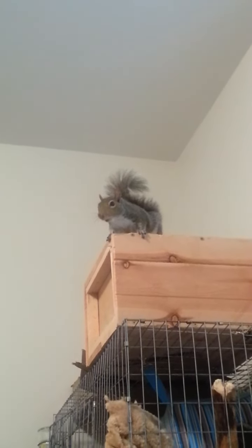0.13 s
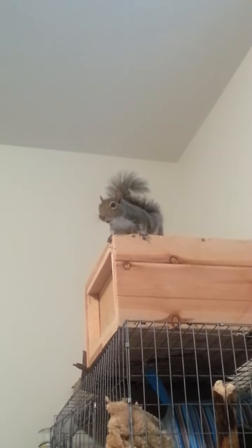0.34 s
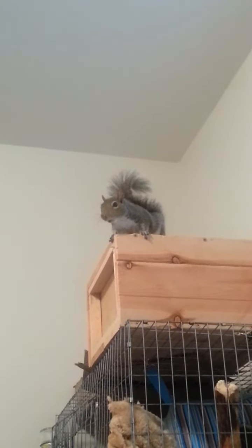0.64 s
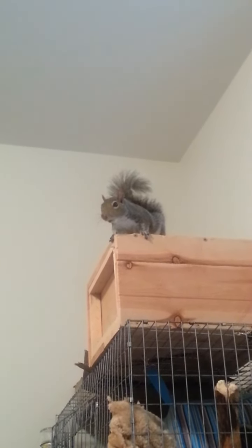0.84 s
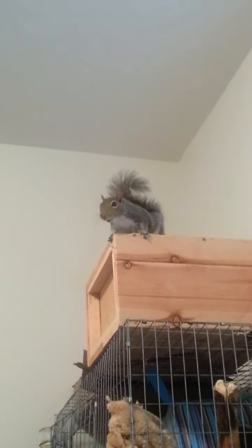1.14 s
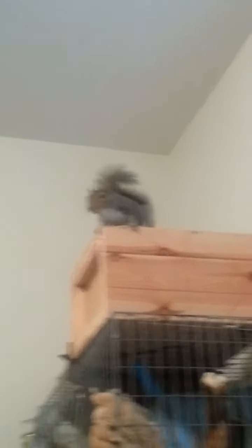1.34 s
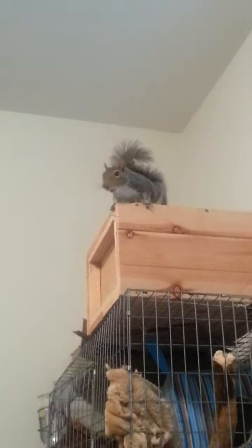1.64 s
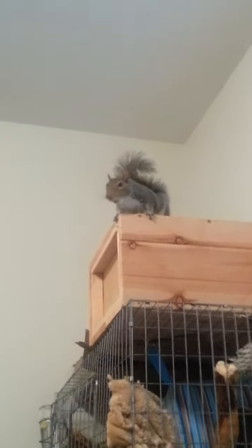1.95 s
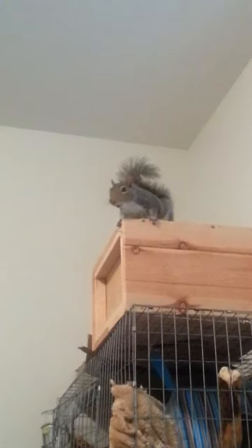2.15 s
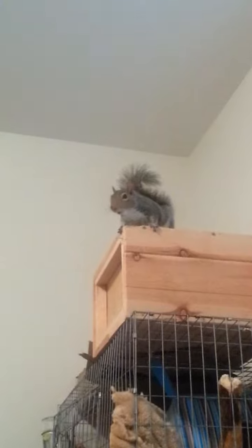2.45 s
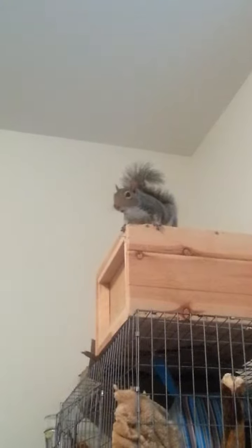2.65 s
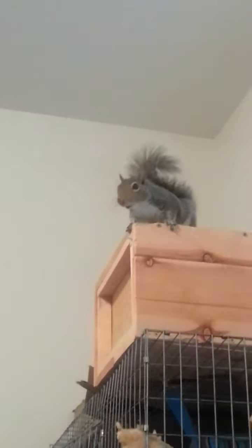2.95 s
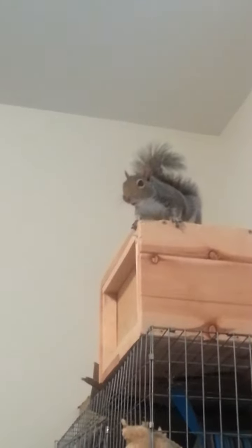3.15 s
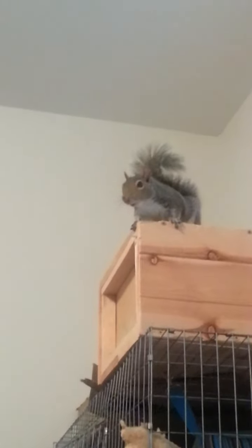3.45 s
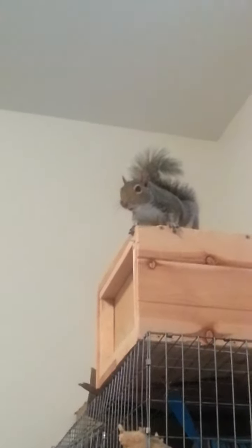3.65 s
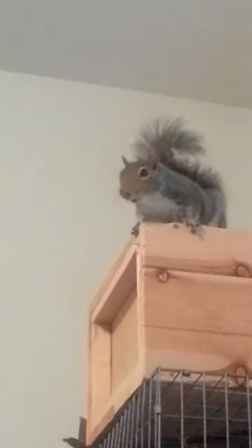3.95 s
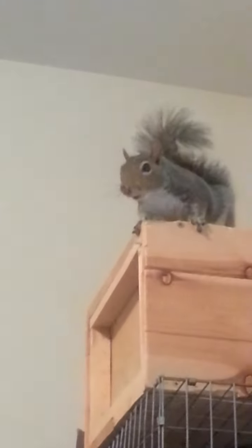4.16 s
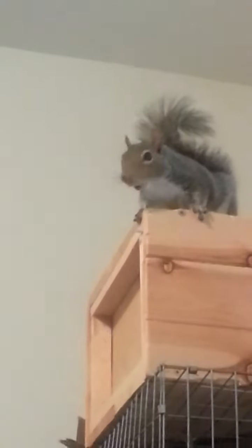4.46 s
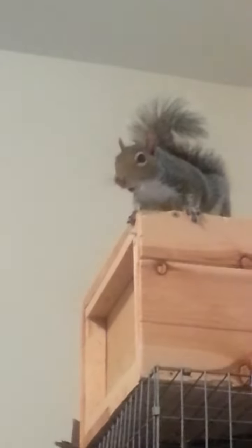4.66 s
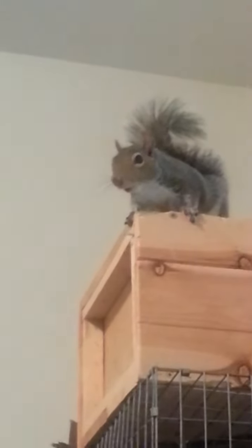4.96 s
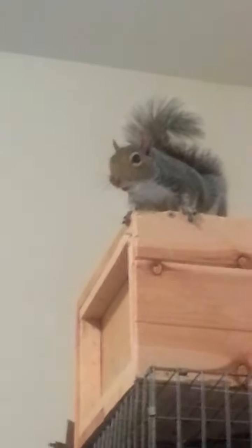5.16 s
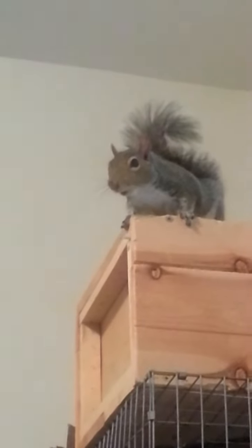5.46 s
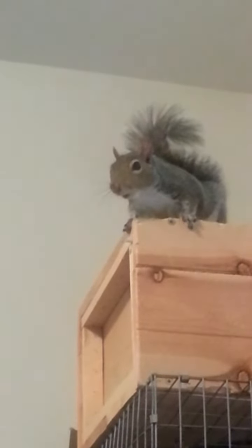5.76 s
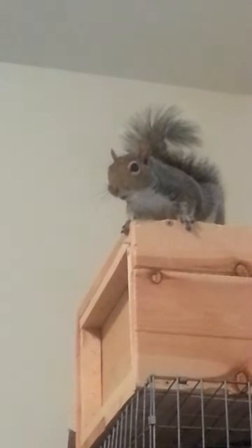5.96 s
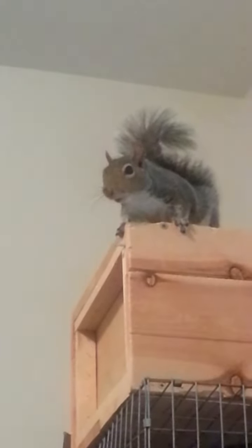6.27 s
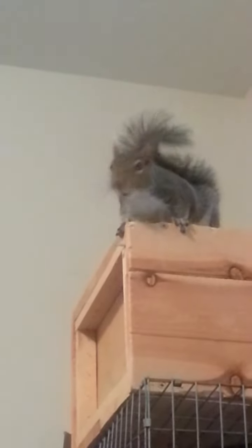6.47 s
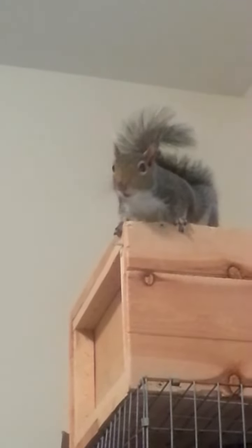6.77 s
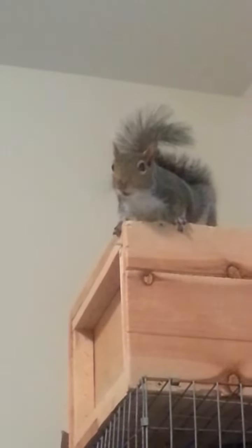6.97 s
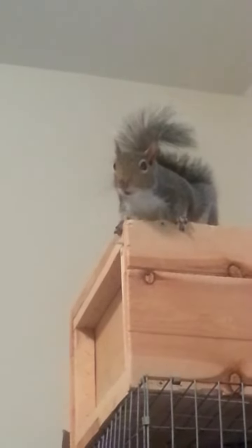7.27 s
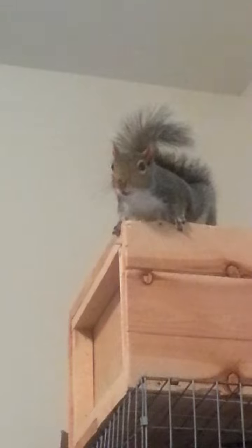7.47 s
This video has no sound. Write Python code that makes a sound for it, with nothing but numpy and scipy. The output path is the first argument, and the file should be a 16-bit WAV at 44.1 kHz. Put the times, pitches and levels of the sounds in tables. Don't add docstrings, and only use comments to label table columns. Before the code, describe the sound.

A young squirrel in a bare room gives two long, harsh rasping calls that sag in pitch, then three short sharp barks over faint house rumble.

```python
import sys
import numpy as np
from scipy import signal
from scipy.fft import rfft, irfft, next_fast_len
from scipy.io import wavfile
from scipy.ndimage import uniform_filter1d

SR = 44100
rng = np.random.default_rng(int(sys.argv[2]) if len(sys.argv) > 2 else 0)


def elevation(decibels):
    levels = np.asarray(decibels, float)
    return 10 ** (levels / 20)


def generate_wav(sig):
    pcm = np.round(np.clip(np.atleast_2d(sig).T, -1, 1) * 32767).astype(np.int16)
    wavfile.write(sys.argv[1], SR, pcm)


N = 335601

# frequency_hz, level_db (per Hz)
HOUSE_SPECTRUM = [(15, -71), (25, -26.5), (35, -20), (48, -6), (108, -3), (229, -12.5), (256, -14),
                  (545, -19.5), (840, -19.5), (1890, -27), (2550, -29), (5570, -29.5), (8360, -34),
                  (14800, -34.5), (16000, -34.5)]
HOUSE_DB = -49
# frequency_hz, likeness (-1 to 1)
LEFT_RIGHT_LIKENESS = [(60, 0.71), (180, 0.74), (550, 0.24), (1650, 0.13), (4970, -0.1), (15000, -0.69)]
# frequency_hz, level_db (per Hz)
TRAFFIC_SPECTRUM = [(53, -30), (90, -6.5), (146, -11.5), (230, -8.5), (287, -12), (374, -22.5),
                    (789, -12.5), (1990, -24), (3000, -27), (3900, -59), (6600, -120)]
# time_s, level_db
TRAFFIC_FADE = [(0, -50.5), (.6, -50.5), (1.2, -54), (1.6, -53), (2.3, -61), (3, -63.5), (7.61, -78)]
# pitch_hz, width_hz, level_db
ENGINE_TONES = [(142.6, 20, -1.5), (292.1, 6.5, -7.5)]
# time_s, peak_db, half_width_s
ENGINE_SWELLS = [(.23, -51, .05), (.78, -49, 0.39), (1.48, -47.5, 0.19), (2.05, -59, .07), (2.95, -52, 0.2),
                 (3.4, -53, .1), (3.92, -44.5, 0.28), (4.68, -43, 0.15), (5.5, -53.5, .3),
                 (6.2, -51, 0.034), (6.41, -54, 0.047), (7.33, -53, 0.094)]
# time_s, peak_db
DRIVE_TICKS = [(0.0, -60.5), (7.61, -63)]
# start_s, peak_db, left_minus_right_db, favoured_hz, loss_db (per octave away)
FINGER_TAPS = [
    (1.4453, -9.5, -7, 4500, 3),
    (1.498, -19.5, -3, 3200, 32),
    (1.504, -20, -12, 1400, 9),
]
# pitch_hz, level_db, decay_s (to -60 dB)
CASING_RINGS = [(820, -7, 0.0052), (2620, -7, 0.01), (3200, -14, 0.0047), (5080, 6, 0.0029),
                (5700, -9, 0.0013), (8900, -6, 0.0019), (13200, 6.5, 0.0028)]
# start_s, length_s, level_db
LONG_CALLS = [
    (1.5292, .6, -15.5),
    (4.2546, .66, -16),
]
# start_s, length_s, level_db
BARKS = [
    (6.47, .15, -18),
    (6.802, .129, -19),
    (7.21, .135, -19),
]
CALL_TRACT = {"throat": [(1984, 330, -1.5), (2514, 500, 1.5), (3053, 500, -7)], "chest": [(386, 190, -2),
              (632, 370, 3.5), (989, 140, 4), (1317, 510, 0.5)], "mouth": [(3290, 230, 6.5),
              (3700, 740, 11.5), (4560, 500, -20), (5140, 1100, -19.5)], "breath": [(5690, 1300, 2),
              (7130, 660, 0), (8860, 1500, 4), (11130, 1800, -2.5), (13300, 7400, -9.5)]}
BARK_TRACT = {"throat": [(2350, 194, 3), (2657, 360, -5.5), (2017, 410, -5)], "chest": [(330, 240, -9),
              (576, 170, -3.5), (870, 280, 2.5), (1400, 250, -5)], "mouth": [(1880, 470, 2.5),
              (3030, 740, 1.5), (3800, 630, -3), (4300, 1440, -11)], "breath": [(5700, 990, 1.5),
              (7250, 1000, 0.5), (9200, 1800, -6), (10930, 1200, -6), (13700, 4200, -9)]}
# after_start_s, pitch_hz, airflow_db, throat_tuning (0-1), mouth_opening (0-1)
CALL_OPENS = [(0, 515.3, -2.5, 0.5, 0.1), (.024, 524.2, 0, 0.81, 0.7), (.036, 675, 0.5, .85, .55),
              (.1, 680, -3.5, 1.05, .55), (.22, 705.2, -2, 1.07, 0.91)]
# before_end_s, pitch_hz, airflow_db, throat_tuning (0-1), mouth_opening (0-1)
CALL_CLOSES = [(.31, 655, 0, 0.92, 0.83), (.2, 572, -1, 0.92, 0.9), (.045, 490, -3, 0.79, 1.086),
               (0.0018, 476, -12.5, 0.53, 0.17)]
# share_of_length (0-1), pitch_hz, airflow_db, throat_tuning (0-1), mouth_opening (0-1)
BARK_SHAPE = [(0, 567.5, -2, 0.15, 0.5), (.21, 481.3, 0, 0.61, 0.95), (.49, 478.7, -0.5, 0.95, 0.89),
              (0.619, 504.2, -3, 1.08, 0.72), (.85, 490, -21, .93, .47), (1, 479.4, -18, 0.33, 0.78)]
# after_start_s, roughness (0-1)
RASP_SETS_IN = [(0, .45), (.072, .52), (.102, 1)]
# before_end_s, roughness (0-1)
RASP_CLEARS = [(.25, .72), (.2, .35), (.085, .28), (0, .33)]
# after_start_s, roughness (0-1)
BARK_RASP = [(0, .3), (.013, .45), (.029, .93)]
# chest_db, open_mouth_db, breath_db, breath_share (of the mouth's swing), strain_hz
CALL_MIX = (-22, -11.5, -32.5, 0.21, 420)
BARK_MIX = (-14.5, -8.5, -17.5, 0.83, 298)
FIRST_BARK_S = 6.0
TUNING_DB, OPENING_DB = 30, 30
STRAIN_DB, STRAIN_DB_PER_ROUGH = 6.5, 23
STRAIN_FROM, STRAIN_CUT_DB = .68, 200
# frequency_hz, decay_s (to -60 dB)
ROOM_DECAY = [(300, 0.17), (1000, 0.36), (2000, 0.34), (2450, 0.38), (3000, 0.31), (4000, 0.35),
              (9000, 0.2)]
ROOM_DB, LEFT_LEAD_S = -3.5, .0001
# frequency_hz, left_minus_right_db
CASING_SHADOW = [(400, 0.5), (1000, 1.5), (2400, -4), (4500, 4.5), (9000, 5.5), (14000, 3.5)]


def rms_one(x):
    return x / np.sqrt(np.mean(x ** 2) + 1e-20)


def in_time(rows):
    s, *columns = np.transpose(rows)
    return [np.interp(np.arange(N) / SR, s, c) for c in columns]


def at_hz(points, hz):
    table_hz, values = np.array(points)[:, 0], np.array(points)[:, 1]
    return np.interp(np.log(hz), np.log(table_hz), values)


def band_filter(x, order, edges_hz, kind):
    return signal.sosfilt(signal.butter(order, edges_hz, kind, fs=SR, output="sos"), x)


def drift(rate_hz):
    return rms_one(band_filter(rng.standard_normal(N), 2, rate_hz, "low"))


def resonate(x, modes):
    out = 0
    for k, (hz, width_hz, level_db) in enumerate(modes):
        r = np.exp(-np.pi * width_hz / SR)
        stage = [(1 - r * r) / 2, 0, -(1 - r * r) / 2, 1, -2 * r * np.cos(2 * np.pi * hz / SR), r * r]
        out = out + (-1) ** k * elevation(level_db) * signal.sosfilt([stage, stage], x)
    return out


def ring(clicks, modes):
    out = 0
    for hz, level_db, decay_s in modes:
        r, w = elevation(-60 / (decay_s * SR)), 2 * np.pi * hz / SR
        sine = [0, np.sin(w)], [1, -2 * r * np.cos(w), r * r]
        out = out + elevation(level_db) * signal.lfilter(*sine, clicks + 1e-18)
    return out


def coloured(spectrum, flicker_db):
    hz = np.maximum(np.fft.rfftfreq(N, 1 / SR), 1)
    alike = np.clip(at_hz(LEFT_RIGHT_LIKENESS, hz), 0, 1)
    mid, side = rfft(rng.standard_normal((2, N))) * elevation(at_hz(spectrum, hz))
    pair = [np.sqrt(1 + alike) * mid + sign * np.sqrt(1 - alike) * side for sign in (1, -1)]
    return rms_one(irfft(np.array(pair), N) * elevation(flicker_db * drift(6.0)))


def house():
    return elevation(HOUSE_DB) * coloured(HOUSE_SPECTRUM, flicker_db=.15)


def traffic():
    fade_db, = in_time(TRAFFIC_FADE)
    tones = 0
    for hz, width_hz, level_db in ENGINE_TONES:
        tones = tones + elevation(level_db) * rms_one(resonate(rng.standard_normal(N), [(hz, width_hz, 0)]))
    return elevation(fade_db) * (coloured(TRAFFIC_SPECTRUM, flicker_db=-2.5) + tones)


def engine_throb():
    t = np.arange(N) / SR
    pitch_hz = 58 * (1 + 0.046 * drift(2.2))
    throb = np.sqrt(2) * np.sin(2 * np.pi * np.cumsum(pitch_hz) / SR)
    swell = elevation(-67.5)
    for s, peak_db, half_width_s in ENGINE_SWELLS:
        swell = swell + elevation(peak_db - 4.5) * np.exp(-((t - s) / half_width_s) ** 2)
    return swell * throb


def camera_drive():
    peak_db, = in_time(DRIVE_TICKS)
    rate_hz = 31 * (1 + .08 * drift(11.0))
    steps = np.diff(np.floor(np.cumsum(rate_hz) / SR), prepend=0)
    ticks = steps * elevation(peak_db + 2.03 * rng.standard_normal(N))
    return ring(ticks, [(5600, 3.5, 0.016), (5960, 1.5, 0.0157), (4500, -3.5, 0.016)])


def finger():
    out = np.zeros((2, N))
    for s, peak_db, pan_db, favoured_hz, loss_db in FINGER_TAPS:
        clicks = np.zeros((2, int(.03 * SR)))
        for side, (late_s, sign, rebound) in enumerate([(.0003, 0.12, 0.067), (0.00084, -0.053, 0.59)]):
            at = round(late_s * SR)
            clicks[side, at] = -elevation(peak_db + sign * pan_db / 2)
            clicks[side, at + round(.00062 * SR)] = rebound * clicks[side, at]
        modes = [(hz, db - loss_db * abs(np.log2(hz / favoured_hz)), decay_s)
                 for hz, db, decay_s in CASING_RINGS]
        soft_clicks = signal.lfilter([.25, .5, .25], [1], clicks)
        left, right = ring(soft_clicks, modes)
        left = band_filter(left, 3, [900, 6800], "band")
        start = round(s * SR)
        out[:, start:start + len(left)] += left, right
    return out


def gestures():
    moves, rasp = [], []
    for start, length, level_db in LONG_CALLS:
        end = start + length
        moves += [(start + s, level_db, *row, *CALL_MIX) for s, *row in CALL_OPENS]
        moves += [(end - s, level_db, *row, *CALL_MIX) for s, *row in CALL_CLOSES]
        rasp += [(start + s, r) for s, r in RASP_SETS_IN]
        rasp += [(end - s, r) for s, r in RASP_CLEARS]
    for start, length, level_db in BARKS:
        moves += [(start + share * length, level_db, *row, *BARK_MIX) for share, *row in BARK_SHAPE]
        rasp += [(start + s, r) for s, r in BARK_RASP]
        rasp += [(start + length, 1)]
    return in_time(moves), in_time(rasp)[0]


def folds(pitch_hz, rough):
    shaken_hz = pitch_hz * np.clip(1 + .22 * rough ** 2 * drift(260), .3, 2)
    cycles = np.cumsum(shaken_hz) / SR
    shut = np.flatnonzero(np.diff(np.floor(cycles)) > 0)
    late = (cycles[shut + 1] % 1) / (cycles[shut + 1] - cycles[shut])
    chance = 3.7 * drift(180) + 2.9 * rng.standard_normal(N)
    strength = elevation(rough * 8.76 * np.tanh(chance / 5.5))[shut]
    snaps = np.zeros(N)
    snaps[shut] += late * strength
    snaps[shut + 1] += (1 - late) * strength
    parted = (.5 + .5 * np.cos(2 * np.pi * cycles)) ** 2
    gust = parted * rng.standard_normal(N)
    return rms_one(snaps), rms_one(gust)


def evened(x):
    return x / np.sqrt(uniform_filter1d(x ** 2, int(.035 * SR)) + 1e-12)


def squirrel():
    moves, rough = gestures()
    level_db, pitch_hz, flow_db, tuning, opening = moves[:5]
    chest_db, mouth_db, breath_db, breath_share, strain_hz = moves[5:]
    t = np.arange(N) / SR
    sounding = 0
    for s, length, _ in LONG_CALLS + BARKS:
        fade_in = np.clip((t - s) / 0.002, 0, 1)
        fade_out = np.clip((s + length - t) / 0.0086 + 1, 0, 1)
        sounding = sounding + fade_in * fade_out

    snaps, gust = folds(pitch_hz, rough)
    strain_db = STRAIN_DB - STRAIN_DB_PER_ROUGH * (1 - rough)
    strain_db = strain_db - STRAIN_CUT_DB * np.maximum(STRAIN_FROM - rough, 0)
    strain_snaps, _ = folds(strain_hz, .72 + .2 * (t > FIRST_BARK_S))
    snaps = snaps + elevation(strain_db) * strain_snaps
    voiced = snaps + (.36 + .5 * rough) * gust

    escaping_db = flow_db + OPENING_DB * (opening - 1)
    drive = {"throat": (voiced, flow_db + TUNING_DB * (tuning - 1) - 1.5),
             "chest": (snaps + 1.76 * rough * gust, chest_db + flow_db),
             "mouth": (voiced, mouth_db + escaping_db),
             "breath": (gust + 0.31 * snaps, breath_db + breath_share * escaping_db)}
    out = 0
    for part, (source, relative_db) in drive.items():
        call_rings = resonate(source, CALL_TRACT[part])
        bark_rings = resonate(source, BARK_TRACT[part])
        rings = np.where(t < FIRST_BARK_S, call_rings, bark_rings)
        out = out + elevation(level_db + relative_db) * evened(rings)
    return out * sounding


def room(x):
    t = np.arange(int(.8 * SR)) / SR
    edges = 200 * 2 ** np.arange(0, 6.4, 1 / 3)
    build_up = np.clip((t - .003) / 0.003, 0, 1)
    whites = rng.standard_normal((2, 2, len(t))) * build_up
    echo = 0
    for k, (low, high) in enumerate(zip(edges, edges[1:])):
        band = band_filter(whites[k % 2], 2, [low, high], "band")
        decay_s = at_hz(ROOM_DECAY, np.sqrt(low * high))
        echo = echo + band * elevation(-60 * t / decay_s) / np.sqrt(decay_s)
    echo = echo / np.sqrt(np.sum(echo ** 2, axis=1, keepdims=True))
    wet = signal.fftconvolve(x[None], echo, axes=1)[:, :N]

    size = next_fast_len(N + 64)
    hz = np.fft.rfftfreq(size, 1 / SR) + 1e-3
    late_s = np.array([[.0004 - LEFT_LEAD_S], [.0004]])
    direct = rfft(x, size) * np.exp(-2j * np.pi * hz * late_s)
    shadow = elevation(at_hz(CASING_SHADOW, hz) * [[.5], [-.5]])
    return irfft((direct + elevation(ROOM_DB) * rfft(wet, size)) * shadow, size)[:, :N]


def scene():
    background = house() + traffic() + engine_throb()
    return background + camera_drive() + finger() + room(squirrel())


def top_cut(x):
    return signal.sosfilt(signal.butter(12, 15550, fs=SR, output="sos"), x)


def record(dry):
    ported = band_filter(dry, 2, 32, "high")
    rounded = 0.89 * np.tanh(ported / 0.87)
    return top_cut(rounded)


dry = scene()
out = record(dry)
generate_wav(out)
```